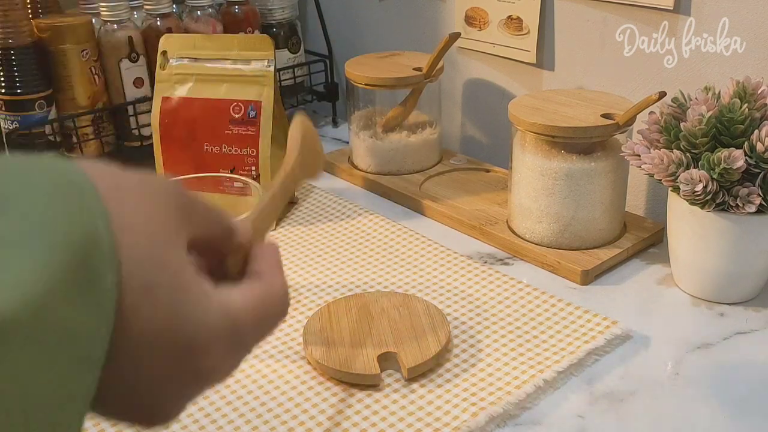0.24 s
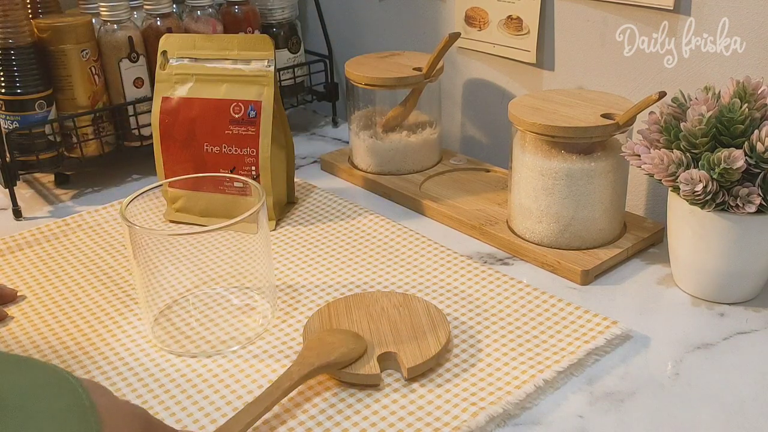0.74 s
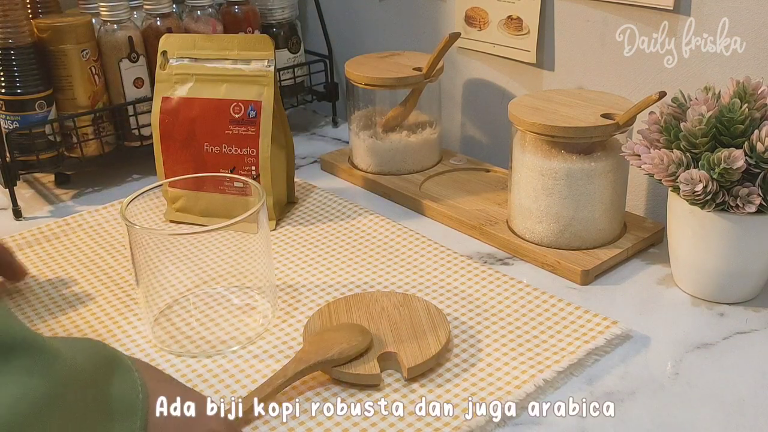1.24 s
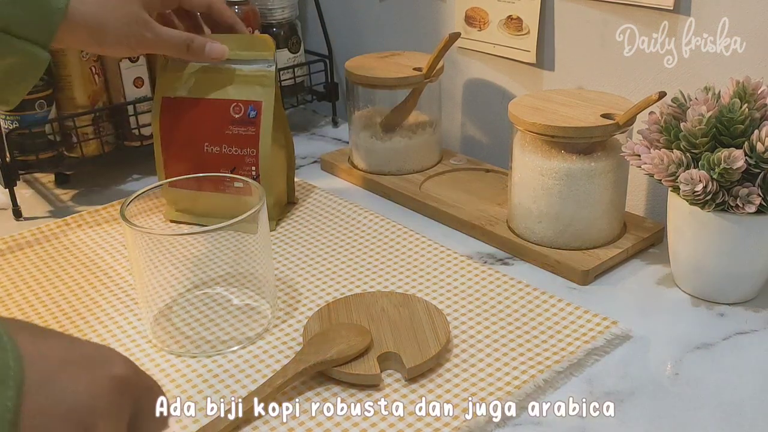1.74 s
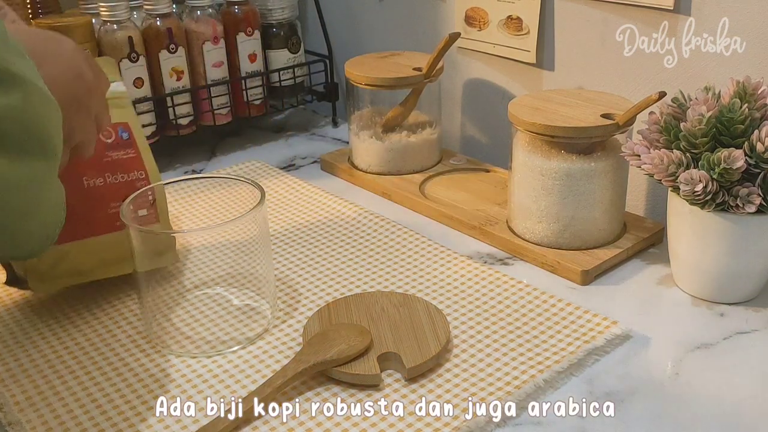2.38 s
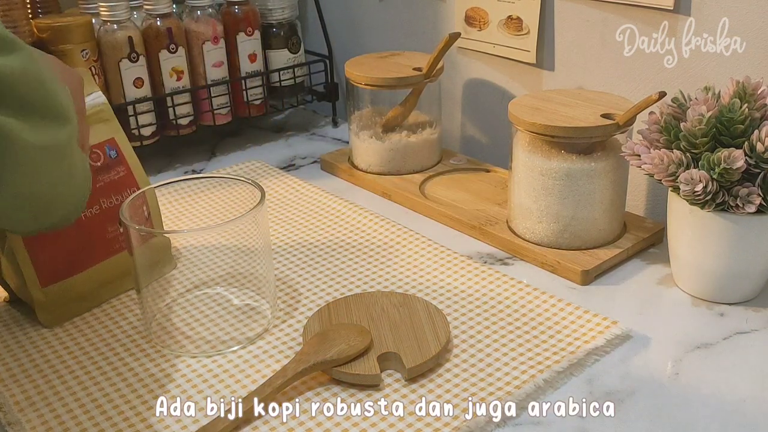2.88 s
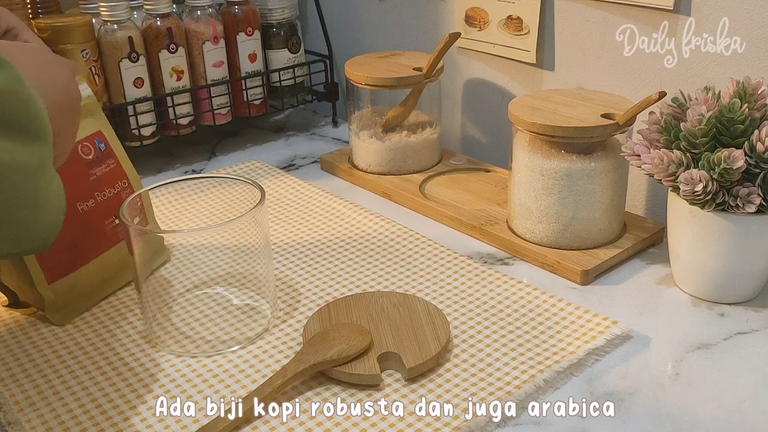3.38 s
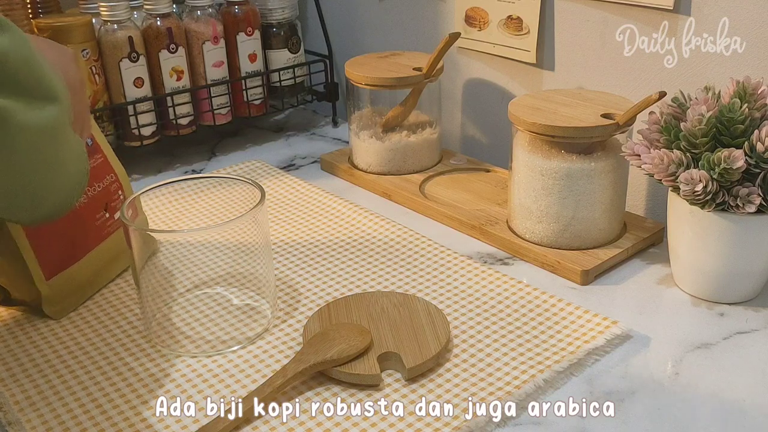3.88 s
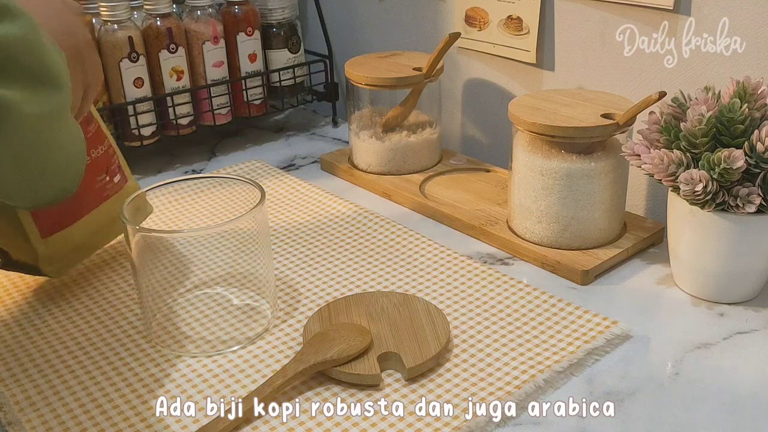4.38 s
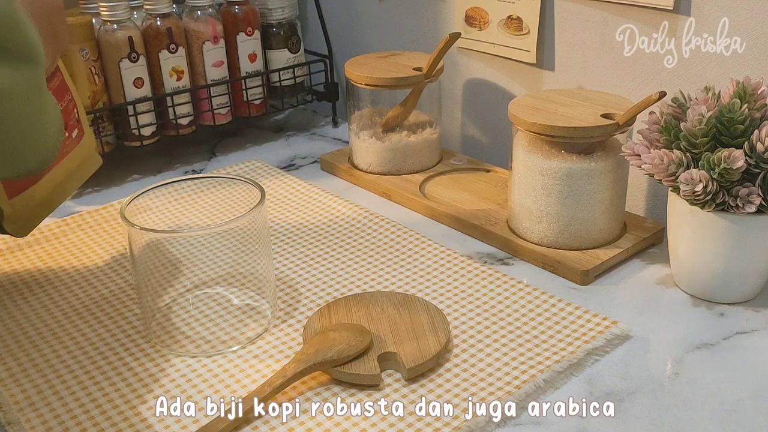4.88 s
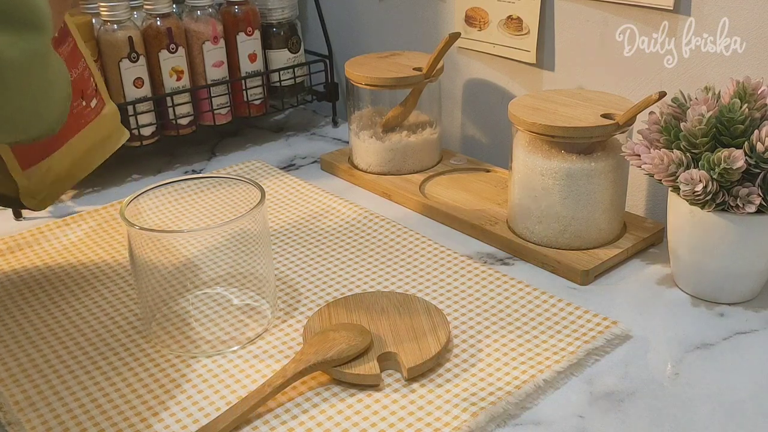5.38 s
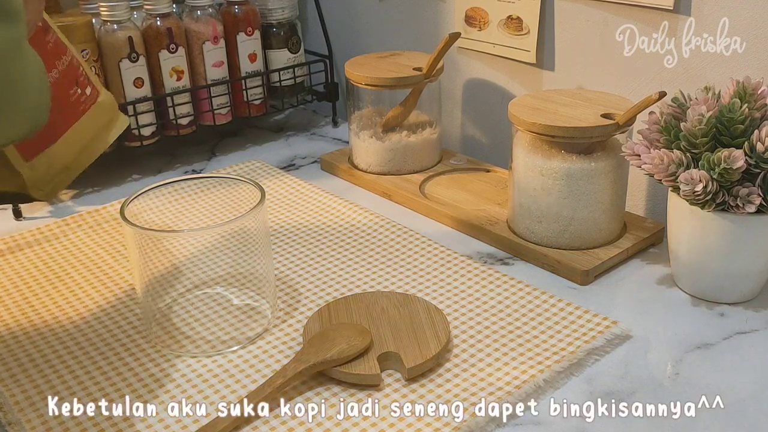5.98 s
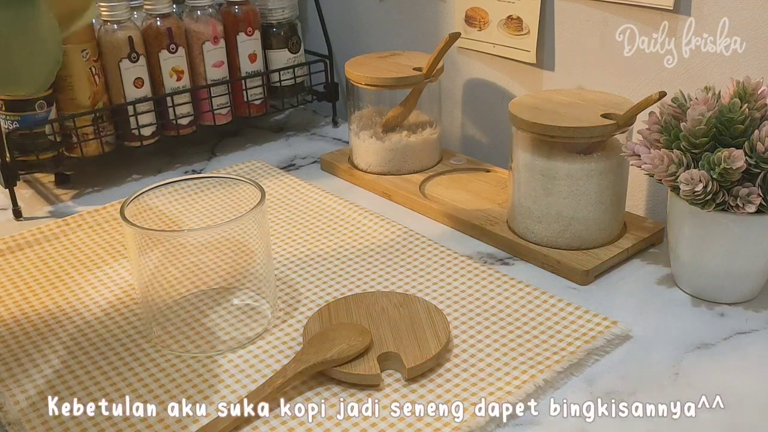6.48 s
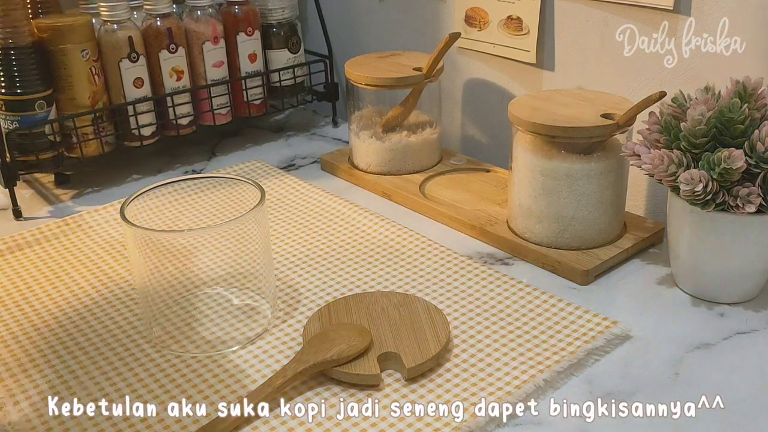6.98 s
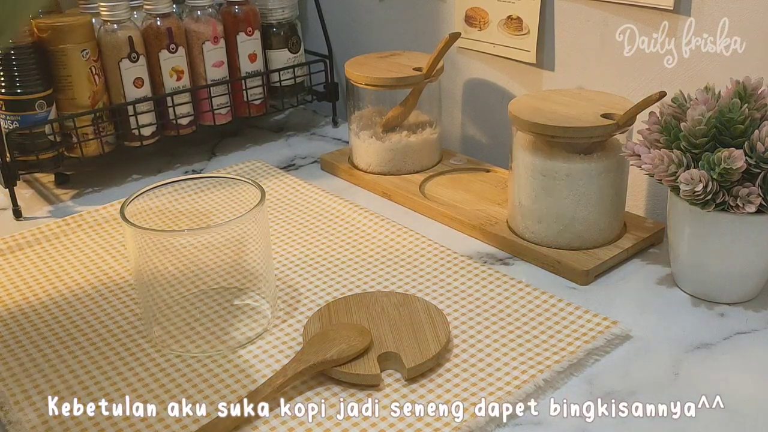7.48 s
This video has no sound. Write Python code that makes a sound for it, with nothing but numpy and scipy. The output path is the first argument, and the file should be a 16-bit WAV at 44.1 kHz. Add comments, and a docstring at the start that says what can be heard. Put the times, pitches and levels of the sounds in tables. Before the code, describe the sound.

A stiff coffee pouch crinkles, rustles and snaps close to a pair of microphones, just after a single clack of a wooden spoon and a soft tick. The crackling comes in uneven bursts, with two strong crunches as the pouch is tugged open, then a pause and a few lighter crinkles. The hard kitchen walls briefly echo each snap over a faint low hum and hiss.

```python
"""A wooden spoon is laid down with a clack in a quiet kitchen; a faint, duller tick of something else follows.
Then a stiff pouch of coffee beans is picked up, handled and pulled open: its walls buckle with a snap,
its panels drum, and tiny creases crinkle as fingers and sleeve rub over it.
A spaced pair of microphones stands close by, and the hard room answers every snap."""
import sys
import numpy as np
from scipy import signal
from scipy.fft import rfft, irfft
from scipy.io import wavfile
from scipy.ndimage import uniform_filter1d

SR = 44100
rng = np.random.default_rng(int(sys.argv[2]) if len(sys.argv) > 2 else 0)


def wav_record(signal):
    """Record a signal, one row per channel, as 16-bit PCM in the file named by sys.argv[1]."""
    frames = np.transpose(np.atleast_2d(signal))
    bounded = np.clip(frames, -1, 1)
    # unit amplitude maps onto the largest positive 16-bit level
    quanta = np.round(bounded * 32767).astype(np.int16)
    wavfile.write(sys.argv[1], SR, quanta)


N = 341334
BAND_LIMIT_HZ = 15950


def amp(db):
    """Decibels to gain."""
    return 10 ** (np.asarray(db) / 20)


def unit_rms(x):
    """Scales to an rms of one."""
    return x / np.sqrt(np.mean(x ** 2) + 1e-30)


def unit_hit(x):
    """Scales a stereo hit to the energy of one millisecond at rms one."""
    return x / np.sqrt(np.sum(x ** 2) / 2 / (SR / 1000) + 1e-30)


def curve_at(points, hz):
    """Reads a curve on a log-frequency axis."""
    f, value = np.transpose(points)
    return np.interp(np.log(hz + 1), np.log(f + 1), value)


def wander(position, knots):
    """A random curve that glides to a new value at each whole position."""
    return np.interp(position, np.arange(knots), rng.standard_normal(knots))


def add(mix, s, sound):
    """Mixes a sound in at time s."""
    part = mix[:, max(round(s * SR), 0):][:, :sound.shape[1]]
    part += sound[:, :part.shape[1]]


def causal(log_gain):
    """The frequency response with this gain that rings only after its cause."""
    circle = np.r_[log_gain, log_gain[-2:0:-1]]
    return np.exp(np.conj(signal.hilbert(circle)))[:len(log_gain)]


def eq(x, points, size=1024):
    """Filters with an EQ curve that falls away steeply beyond its ends."""
    hz = np.fft.rfftfreq(size, 1 / SR) + 1
    octaves_out = np.maximum(np.log2(points[0][0] / hz), 0) + np.maximum(np.log2(hz / points[-1][0]), 0)
    gain = amp(curve_at(points, hz) - 20 * np.minimum(octaves_out, 2))
    return signal.fftconvolve(x, irfft(causal(np.log(gain)))[None], axes=1)


def bursts(envelope, count=3):
    """Noise bursts under an envelope, each evened out to the smooth spectrum of a sharp impact."""
    spectra = rfft(envelope * rng.standard_normal((count, len(envelope))))
    powers = uniform_filter1d(np.abs(spectra) ** 2, 9, axis=1)
    flatten = np.array([causal(-.42 * np.log(p / p.mean() + 1e-4)) for p in powers])
    return irfft(spectra * flatten)


def diffuse(x, spacing_m=.13, sound_m_per_s=343):
    """Sound from all sides: alike at the two microphones in the bass, unrelated in the treble."""
    left, other = rfft(x)
    hz = np.fft.rfftfreq(x.shape[1], 1 / SR)
    likeness = .97 * np.sinc(2 * hz * spacing_m / sound_m_per_s)
    likeness *= np.abs(likeness)
    right = likeness * left + np.sqrt(1 - likeness ** 2) * other
    return irfft(np.array([left, right]), x.shape[1])


# room tone, heavy in the lows: (frequency [Hz], level [dB])
AIR_EQ = [(10, -8), (22, -18), (32, -6), (52, -8), (76, -16), (105, -11), (131, -17), (160, -14.5),
          (300, -19), (480, -20), (1200, -23.5), (4300, -29), (10000, -29.5), (11500, -38.5),
          (16000, -35.5)]
def air(level_db=-60.82):
    """The bed: steady hiss and rumble of the kitchen."""
    noise = rfft(rng.standard_normal((2, N))) * amp(curve_at(AIR_EQ, np.fft.rfftfreq(N, 1 / SR)))
    return amp(level_db) * unit_rms(diffuse(irfft(noise, N)))


def hum(hz=126.4, level_db=-72, waver_db=3, waver_s=0.18):
    """A faint low hum in the room that wavers in level."""
    t = np.arange(N) / SR
    waver = amp(waver_db * wander(t / waver_s, knots=80))
    return amp(level_db) * unit_rms(waver * np.sin(2 * np.pi * hz * t))


# reverb decay: (frequency [Hz], t60 [s])
ROOM_T60 = [(200, 0.2), (550, 0.61), (1400, 0.5), (3700, 0.5039), (9000, 0.436), (15000, 0.29)]
# reverb colour: (frequency [Hz], level [dB])
ROOM_EQ = [(100, 17), (400, 1), (1500, 5.5), (4000, 4), (9000, 4), (15000, 2)]
def kitchen_reverb(send, wall_s=0.0075, near_db=-7, echo_db=4, echo_s=0.035):
    """Faint scatter from things on the counter, then the walls' first echoes and a short tail."""
    t = np.arange(SR * 2 // 3) / SR
    wall_echoes = 1 + (amp(echo_db) - 1) * np.exp(-abs(t - wall_s) / echo_s)
    arrival = np.where(t < wall_s, amp(near_db) * (t > .002), wall_echoes)
    density = np.minimum(.12 + 4 * t, 1)  # echoes crowd together as they age
    echoes = rng.choice([-1, 1], (2, len(t))) * (rng.random((2, len(t))) < density) / np.sqrt(density)
    hz, age, bands = signal.stft(diffuse(echoes), SR, nperseg=256)
    bands *= amp(curve_at(ROOM_EQ, hz)[:, None] - 60 * age / curve_at(ROOM_T60, hz)[:, None])
    tail = signal.istft(bands, SR, nperseg=256)[1][:, :len(t)] * arrival
    return signal.fftconvolve(send, tail / np.linalg.norm(tail) * np.sqrt(2), axes=1)[:, :N]


# soft low bumps: (time [s], length [s], pitch [Hz], level [dB])
ARM_BUMPS = [(6.105, .075, 107, -53), (6.17, .17, 106, -59.5), (6.18, .33, 31, -58.5)]
def arm_bumps(pitch_waver=0.16):
    """Uneven low swings swell and die as the arm moves away, dead centre."""
    out = np.zeros((2, N))
    for s, length, hz, db in ARM_BUMPS:
        progress = np.linspace(0, 1, round(length * SR))
        pitch = hz * (1 + pitch_waver * wander(5 * progress, knots=6))
        swing = np.sin(2 * np.pi * np.cumsum(pitch) / SR) * np.sin(np.pi * progress)
        add(out, s, amp(db) * unit_rms(swing)[None])
    return out


# short ring of the spoon's clack, also used for the tick: (pitch [Hz], level [dB], t60 [s])
CLACK_MODES = [(1280, -18, 0.021), (1710, -12.5, 0.0055), (3070, -16.5, 0.019), (3530, -6.5, 0.016),
               (3770, -10, 0.012), (5110, -3.5, 0.017), (5210, -1.5, 0.009), (6000, -8.5, 0.0092),
               (6760, -4, 0.01), (7630, -7, .007), (8200, -3, 0.0065), (8500, -12, 0.0089),
               (9770, 8, 0.0066), (9930, 1.5, 0.0093), (11600, -15, .005), (13150, -13, .006),
               (15100, -16, .006)]
# dry click of the contact: (frequency [Hz], level [dB])
CLICK_EQ = [(300, -6), (800, -5), (1300, 0), (2600, 2), (3400, -1), (4300, -2), (9000, 0), (14000, -19)]
# what a tap spreads into the room: (frequency [Hz], level [dB])
TAP_SEND_EQ = [(800, 0), (2500, 3), (3400, 2.5), (5100, -4), (6800, 1), (9900, -7), (13000, 4)]
# two taps: the spoon's clack, then a faint, duller tick of something else:
# (time [s], level [dB], roll-off [Hz], room send [gain], spot pitch [Hz], spot boost [dB])
TAPS = [(0.6172, -19.5, 16100, 0.49, 9800, 2), (1.2476, -41, 3360, 0.35, 3020, 9)]
def taps(click_db=-14, spot_width_hz=250, rise_s=.00013, chatter_s=.00025, bounce_s=.001, bounce=.35):
    """A double contact clicks and rings, each spot favouring a pitch; returns dry sound and room send."""
    t = np.arange(4096) / SR
    touches = np.zeros((1, len(t)))
    touches[0, [0, round(bounce_s * SR)]] = 1, bounce
    direct, send = np.zeros((2, 2, N))
    for s, db, rolloff_hz, send_gain, spot_hz, spot_db in TAPS:
        ring = np.zeros((2, len(t)))
        for hz, mode_db, t60 in CLACK_MODES:
            boost_db = spot_db * np.exp(-((hz - spot_hz) / spot_width_hz) ** 2)
            envelope = amp(mode_db + boost_db - 60 * t / t60)
            ring += envelope * np.sin(2 * np.pi * (hz * t + rng.random((2, 1))))
        click = eq(bursts(np.exp(-t / chatter_s), count=2), CLICK_EQ)[:, :len(t)]
        touch = unit_hit(ring * (1 - np.exp(-t / rise_s))) + amp(click_db) * unit_hit(click)
        tap = signal.fftconvolve(touches, touch, axes=1)[:, :len(t)]
        tap = amp(db) * unit_hit(signal.lfilter(*signal.butter(8, rolloff_hz, fs=SR), tap))
        add(direct, s, tap * amp([[1.5], [-1.5]]))  # a little to the left
        add(send, s, send_gain * eq(tap, TAP_SEND_EQ))
    return direct, send


# hollow after-ring: (pitch [Hz], level [dB], t60 [s])
HOLLOW_MODES = [(371, 6.5, 0.31), (472, -1, 0.15), (544, -6.5, 0.75), (627, -10, 0.23), (727, -3, 0.15)]
# heavy tugs: (time [s], level [dB])
TUGS = [(2.504, -62), (3.425, -48), (4.7, -59), (5.072, -47.5)]
def tug_rings(rise_s=0.0079):
    """The heaviest tugs leave a faint, hollow ring behind."""
    t, out = np.arange(SR // 2) / SR, np.zeros((2, N))
    for s, db in TUGS:
        ring = sum(amp(mode_db - 60 * t / t60) * np.sin(2 * np.pi * (hz * t + rng.random()))
                   for hz, mode_db, t60 in HOLLOW_MODES)
        add(out, s, amp(db) * (ring * np.minimum(t / rise_s, 1))[None])
    return out


def from_pouch(waves, lead_samples=10):
    """The first wave arrives from the left; the other two are treble scattered off jar and counter."""
    left = waves[0]
    right = np.r_[np.zeros(lead_samples), left[:-lead_samples]]
    scatter = signal.lfilter(*signal.butter(1, 900, "high", fs=SR), waves[1:])
    return np.array([left, right]) + scatter


# the pouch's four voices, from hollow to bright: (frequency [Hz], level [dB])
BODY_EQ = [(60, -4), (125, -7), (190, 5.5), (300, -4.5), (365, -2), (450, -1), (630, 0.5), (780, 4),
           (1100, -5), (1400, -9), (2000, -29.5)]
WALL_EQ = [(850, -12.5), (1400, -9.5), (1850, -3), (2400, -4), (3000, -7.5), (4200, -16.5)]
CRACK_EQ = [(2100, -21.5), (3250, -1.5), (3900, -1), (4600, -0.5), (5400, 0.5), (6300, -3), (8500, -3.5)]
CRISP_EQ = [(4800, -31), (6500, -1), (7400, 1.5), (8400, -3), (9800, -3), (11500, -8), (13500, -14),
            (15400, -8)]
# how sharpness tips each voice: (tilt [dB per dB])
VOICE_TILT = [-0.92, -0.026, 0.073, 0.67]
# where each voice sits: (left minus right [dB])
VOICE_PAN = [0.45, -0.69, -1.6, -0.41]
def pouch_voices(sharpness_db):
    """Each voice's EQ and stereo gain: hollow for sharpness below zero, crisp above."""
    return [(voice, amp(tilt * sharpness_db + pan_db * np.array([[.5], [-.5]])))
            for voice, tilt, pan_db in zip((BODY_EQ, WALL_EQ, CRACK_EQ, CRISP_EQ), VOICE_TILT, VOICE_PAN)]


# how the pouch's top treble comes and goes: (time [s], level [dB])
TOP_TREBLE = [(2.5, -1.5), (3.4, -3), (3.8, -2.5), (4.2, -4.5), (5.0, -2), (5.07, 2.5), (7.6, -2)]
def shade_treble(x, shelf_hz=9300):
    """The top treble is muted at first, opens in the longest crunch and eases back."""
    top = signal.sosfiltfilt(signal.butter(6, shelf_hz, "high", fs=SR, output="sos"), x)
    gain = amp(np.interp(np.arange(N) / SR, *np.transpose(TOP_TREBLE)))
    return x + (gain - 1) * top


def wall_flex(x, depth_db=4.5, patch_cells=9):
    """The pouch's resonances shift as its wall bends: patches of the spectrum swell and fade."""
    bands = signal.stft(x, nperseg=512)[2]
    patches = uniform_filter1d(rng.standard_normal(bands.shape[1:]), patch_cells, axis=0)
    patches = unit_rms(uniform_filter1d(patches, patch_cells, axis=1))
    return signal.istft(bands * unit_rms(amp(depth_db * patches)), nperseg=512)[1][:, :N]


# finger and sleeve strokes: (start [s], end [s], level [dB], sharpness [dB], wall rasp [dB])
STROKES = [(1.599, 1.672, -62.5, 0, -11), (1.936, 2.124, -64.5, 4.5, 1), (2, 2.053, -66, 9, -7),
           (2.246, 2.375, -66.5, 2, -1.5), (2.484, 2.661, -61.5, -1, -20), (2.761, 2.878, -58.5, -1, -7),
           (2.868, 2.979, -61, 7.5, -1), (2.974, 3.122, -63, 5.5, -2), (3.148, 3.234, -64, 8, -18),
           (3.302, 3.367, -66, 0.5, -8), (3.641, 3.709, -71, 8, 4), (3.77, 3.822, -55, 0, -3),
           (4.301, 4.634, -65, 1.5, -4), (4.7, 4.748, -56.5, 2.5, -6), (4.864, 4.93, -62.5, 3.5, -1),
           (4.962, 5.003, -47.5, -0.5, 7), (5.001, 5.068, -45.5, -1, 2), (5.276, 5.424, -61, -0.5, 6),
           (5.525, 5.674, -59, 2, 0.5), (6.058, 6.123, -64, -7, -2), (6.237, 6.324, -79.5, -13, 12.5),
           (6.914, 7.139, -66, 4.5, 0), (7.14, 7.19, -57, -1.5, 2), (7.189, 7.241, -59, 1, 1),
           (7.241, 7.289, -63, -0.5, -2), (7.295, 7.336, -56, 3, -2), (7.342, 7.44, -62.5, -3, 0),
           (7.44, 7.583, -66.5, -1, 3), (7.594, 7.689, -58.5, 2, 6), (7.619, 7.668, -57.5, -3.5, 1),
           (7.705, 7.715, -67, -5.5, -3)]
def rubs(creases_per_s=480, crease_s=.00016, slide=.35, catch_s=.018, catch_db=.5, trim_db=-6):
    """Tiny creases give way at random over a slide that catches and slips, swelling with each stroke."""
    out = np.zeros((2, N))
    low_cut = signal.butter(2, 245, "high", fs=SR)  # a stroke barely moves the pouch as a whole
    for start, end, db, sharpness_db, rasp_db in STROKES:
        n = max(round((end - start) * SR), 500)
        sizes = amp(3 * np.minimum(rng.exponential(1, n), 4))
        onsets = sizes * (rng.random(n) < creases_per_s / SR)
        creases = signal.lfilter([1], [1, -np.exp(-1 / (crease_s * SR))], onsets)
        grip = amp(catch_db * wander(np.arange(n) / SR / catch_s, knots=200))
        arch = np.abs(np.sin(np.linspace(0, np.pi, n))) ** 0.18
        grains = grip * arch * (slide + creases) * rng.standard_normal((3, n))
        friction = signal.lfilter(*low_cut, from_pouch(grains))
        for (voice, gain), voice_db in zip(pouch_voices(sharpness_db), (3.5, rasp_db, 1.6, 4.5)):
            add(out, start, amp(db + voice_db + trim_db) * gain * unit_rms(eq(friction, voice)))
    return wall_flex(out)


def crinkles(per_s=130, trim_db=-1, size_db=3, centre_hz=4200, octaves_per_db=.75, cycles=6.6, pool=120):
    """Single creases flip during each stroke: tiny pitched ticks, higher when the stroke is crisp."""
    t, out = np.arange(400) / SR, np.zeros((2, N))
    for start, end, db, sharpness_db, _ in STROKES:
        creases = np.c_[rng.random(pool), rng.uniform(-1, 1, pool), rng.exponential(1, pool)]
        noises = rng.standard_normal((pool, 3, len(t)))
        count = round(per_s * (end - start))
        for (progress, octave, size), noise in zip(creases[:count], noises):
            hz = np.clip(centre_hz * 2 ** (octaves_per_db * sharpness_db + octave), 500, BAND_LIMIT_HZ * .8)
            tick = signal.lfilter(*signal.iirpeak(hz, 2, fs=SR), noise * np.exp(-t * hz / cycles))
            gain = amp(db + trim_db + size_db * min(size, 3))
            add(out, start + progress * (end - start), gain * unit_hit(from_pouch(tick)))
    return out


# small, high panels beam at the microphones and feed the room less: (frequency [Hz], level [dB])
PANEL_SEND_EQ = [(60, -6.5), (900, -6), (2600, -3), (4400, -9.5), (15000, -17)]
# the wall buckles: (time [s], level [dB], sharpness [dB], wall rasp [dB], panel pitch [Hz], drum [dB])
BUCKLES = [(1.614, -48, 3.5, -10, 1860, -50), (1.641, -44.5, 8, 1, 3960, -53),
           (2.4514, -46.5, -3, -6, 670, -47), (2.472, -48.5, -2, -1, 684, -48),
           (2.4997, -31, -0.5, -6, 700, -38.5), (2.511, -45, 9, -6, 423, -40),
           (2.541, -47, 7, -6, 304, -38.5), (2.6002, -45, -7.5, 5, 930, -37),
           (2.618, -47.5, -11, -13, 990, -53), (2.924, -50.5, 6, -1, 587, -48.5),
           (3.079, -48.5, -10, 3, 700, -40), (3.131, -43, -0.5, 1, 800, -44.5),
           (3.3521, -34.5, 7, 0, 4430, -33.5), (3.414, -32, -1.5, -0.5, 414, -33),
           (3.4251, -24, 17.5, -0.5, 4200, -16), (3.4352, -33.5, -3, -4, 5230, -24),
           (3.4486, -34, 2, -9, 5160, -26), (3.473, -39.5, 2, -5, 4200, -43),
           (3.631, -44.5, -4.5, 4, 1070, -42), (3.7656, -34, 10, -5.5, 820, -36.5),
           (3.8294, -29.5, 8.5, -1.5, 3600, -24.5), (4.014, -43, -4, 2.5, 860, -54),
           (4.17, -55.5, -14.5, 2, 623, -47), (4.2223, -34, -2.5, 0, 2480, -31),
           (4.422, -56, -3, 0, 8000, -49), (4.703, -47.5, -7.5, 1, 397, -50),
           (4.8065, -55.5, -1, 4, 830, -40), (4.9404, -43.5, -1, 4.5, 3170, -36),
           (4.9478, -32, -1, -3, 670, -29), (4.9596, -29.5, 5, -8, 3100, -26.5),
           (4.9678, -32, 18.5, -9, 715, -30), (4.99, -46, 11, -8, 3260, -34), (5.018, -37, 8, 2, 1800, -44),
           (5.03, -40, -5, -5, 596, -33), (5.037, -31.5, -0.5, -5, 840, -38),
           (5.053, -38, 7, -1, 930, -32.5), (5.0673, -31.5, 14, -6, 226, -29.5),
           (5.073, -37, -6, -2, 550, -31.5), (5.077, -27.5, 13, 1, 4640, -27),
           (5.089, -42, 29, 7, 115, -40), (5.359, -43.5, 2, 1, 990, -36.5), (5.388, -48, 0, 1, 1730, -35),
           (5.402, -61, 1, 0, 1900, -45), (5.518, -54, 0, -7, 606, -50), (6.0654, -46, 3, -1, 850, -47),
           (6.354, -56.5, -12.5, -1, 1030, -44), (7.189, -45, 7, 4.5, 590, -37.5),
           (7.199, -50, -7, 2, 1640, -39), (7.207, -54, -5, -2, 1020, -40), (7.226, -57, -6, 3, 1500, -40),
           (7.2897, -41, 2, 0, 2840, -38), (7.2975, -44, 2, -9, 1720, -43), (7.656, -63, 12, -3, 430, -57),
           (7.664, -53, -6, -15, 7440, -51)]
def panel_drums(t60_at_1khz_s=0.021, damping=0.8):
    """A buckled panel shudders through one broad resonance; returns dry sound and room send."""
    t, out = np.arange(6000) / SR, np.zeros((2, N))
    for s, _, _, _, hz, drum_db in BUCKLES:
        t60 = t60_at_1khz_s * (1000 / hz) ** damping  # higher panels die sooner
        shudder = from_pouch(bursts(amp(-60 * t / t60)))
        log_width = 0.32 + 110 / hz
        resonance = signal.butter(2, hz * np.exp(np.array([-.5, .5]) * log_width), "band", fs=SR)
        add(out, s, amp(drum_db) * unit_hit(signal.lfilter(*resonance, shudder)))
    return out, eq(out, PANEL_SEND_EQ)[:, :N]


def fold_colour(x, depth_db=3.5, step_hz=260, full_hz=4000):
    """Every fold of the wall has its own peaks and dips, deepest in the treble."""
    hz = np.fft.rfftfreq(x.shape[1], 1 / SR)
    ripple_db = depth_db * np.minimum(hz / full_hz, 1) * wander(hz / step_hz, knots=200)
    return irfft(rfft(x) * causal(np.log(amp(ripple_db))))


# a snap's body, wall, crack and crisp layers: (level [dB], length [ratio], growth with force [dB per dB])
SNAP_LAYERS = [(1, 1.07, 0.11), (0.65, 1.3, 0.07), (0.5, 0.31, 0.07), (-4, 1.24, 0)]
def snaps(usual_db=-35, usual_s=.0015, halving_db=12, flutter_db=-13, flutter_s=0.0077):
    """Each buckle is a sharp burst and a brief flutter of the wall; harder ones are over sooner."""
    t, out = np.arange(2048) / SR, np.zeros((2, N))
    flutter = amp(flutter_db) * np.exp(-t / flutter_s)
    for s, db, sharpness_db, rasp_db, hz, _ in BUCKLES:
        force_db = db - usual_db
        length = usual_s * .5 ** (force_db / halving_db)
        low_cut = signal.butter(2, min(0.35 * hz, 250), "high", fs=SR)  # small panels radiate little bass
        layers = zip(pouch_voices(sharpness_db), SNAP_LAYERS, (0, rasp_db, 0, 0))
        for (voice, gain), (layer_db, stretch, growth), extra_db in layers:
            age = t / (stretch * length)
            envelope = (1 - np.exp(-age * 3)) * (np.exp(-age * 0.7) + flutter)
            snap = signal.lfilter(*low_cut, from_pouch(fold_colour(bursts(envelope))))
            level = amp(db + layer_db + extra_db + growth * force_db)
            add(out, s, level * gain * unit_hit(eq(snap, voice)))
    return out


def scene(snap_send_db=-1.4, rub_send_db=-1.5):
    """Taps and pouch up front, the kitchen's reverb behind them, room tone underneath."""
    tap, tap_send = taps()
    snap = shade_treble(snaps())
    drum, drum_send = panel_drums()
    rub = shade_treble(rubs() + crinkles())
    reverb = kitchen_reverb(tap_send + amp(snap_send_db) * snap + drum_send + amp(rub_send_db) * rub)
    return tap + snap + drum + rub + reverb + tug_rings() + air() + hum() + arm_bumps()


def record(dry, dc_offset=.0029):
    """Master chain: a steep high cut and a small constant offset."""
    high_cut = signal.firwin(511, BAND_LIMIT_HZ, window=("kaiser", 9), fs=SR)
    return dc_offset + signal.oaconvolve(dry, high_cut[None], "same")


dry = scene()
out = record(dry)
wav_record(out)
```